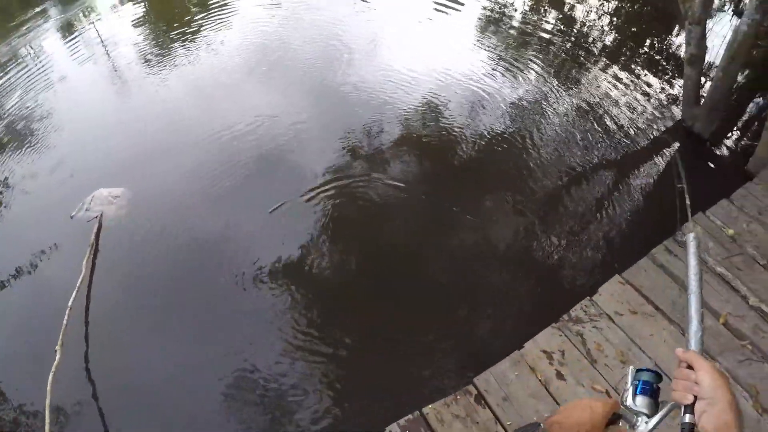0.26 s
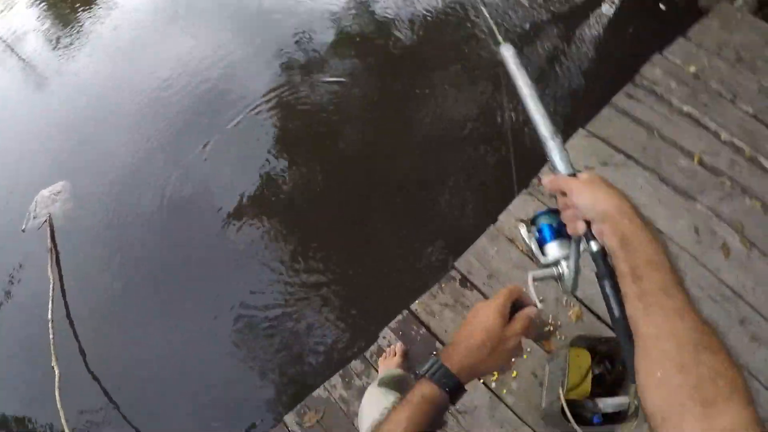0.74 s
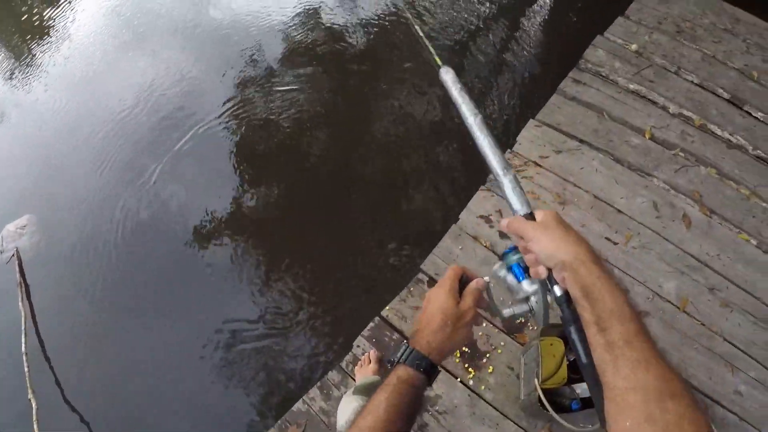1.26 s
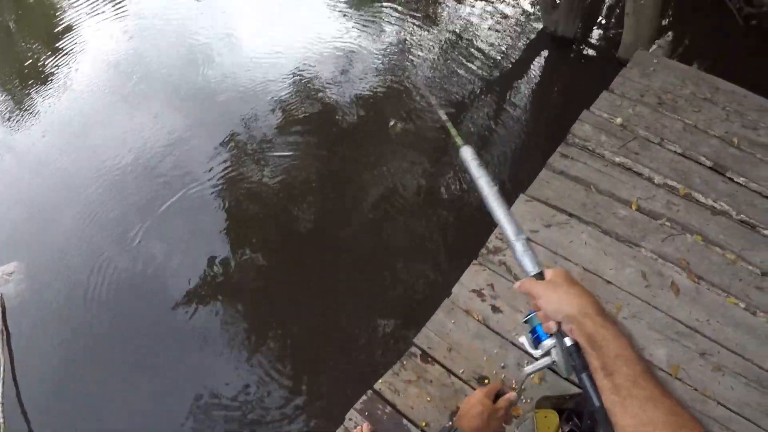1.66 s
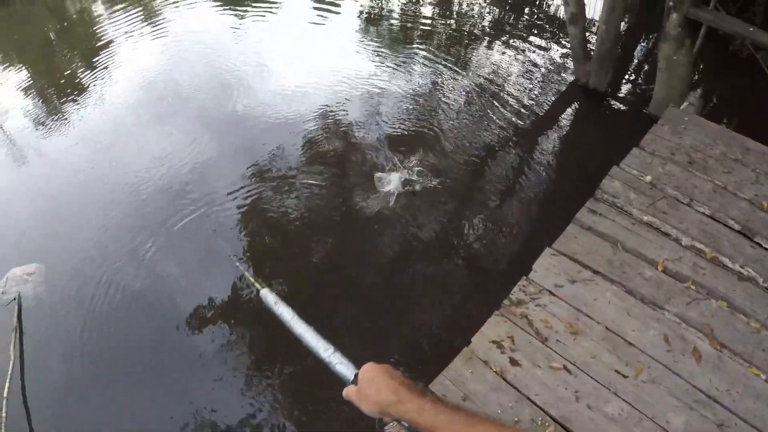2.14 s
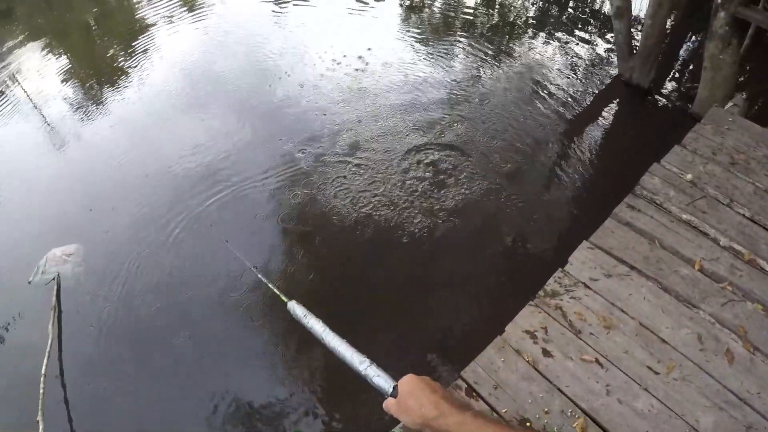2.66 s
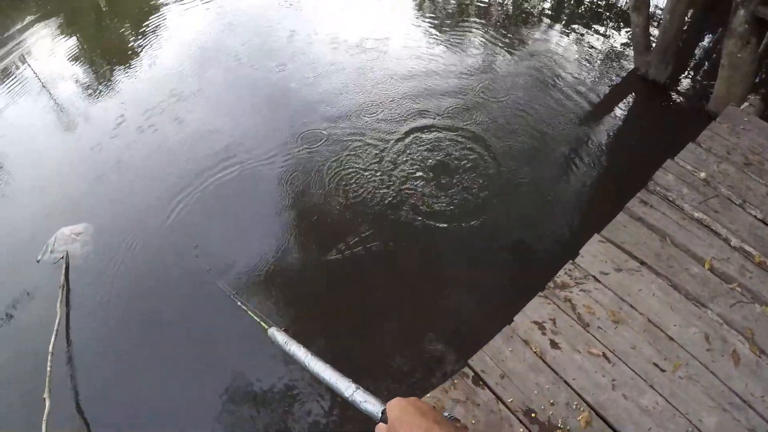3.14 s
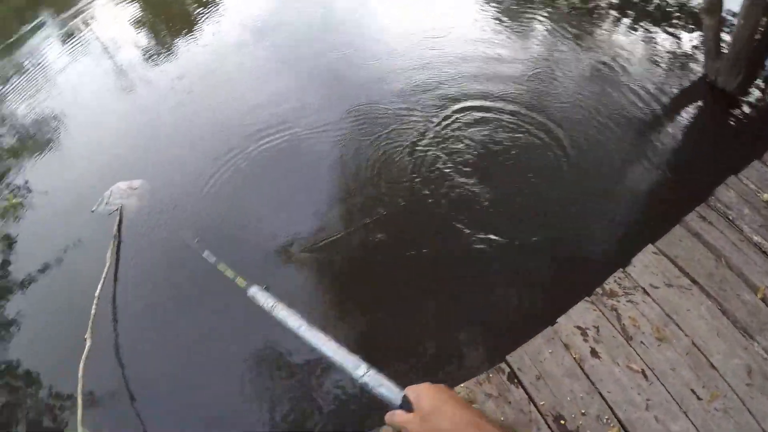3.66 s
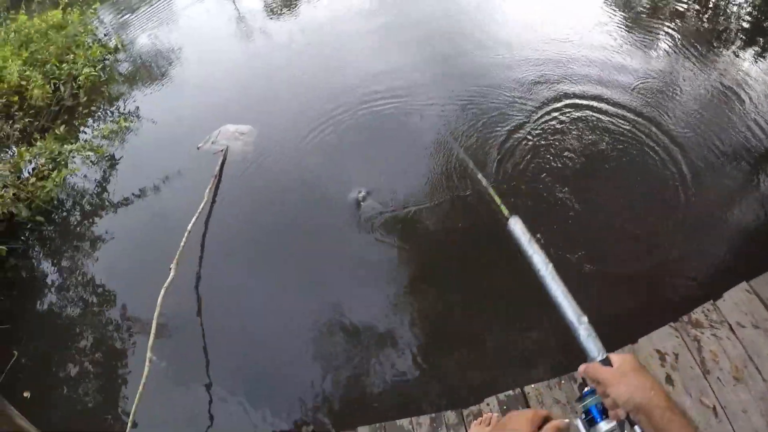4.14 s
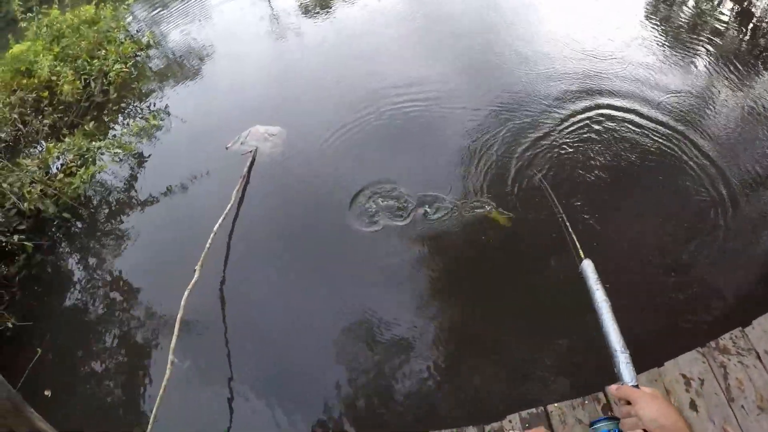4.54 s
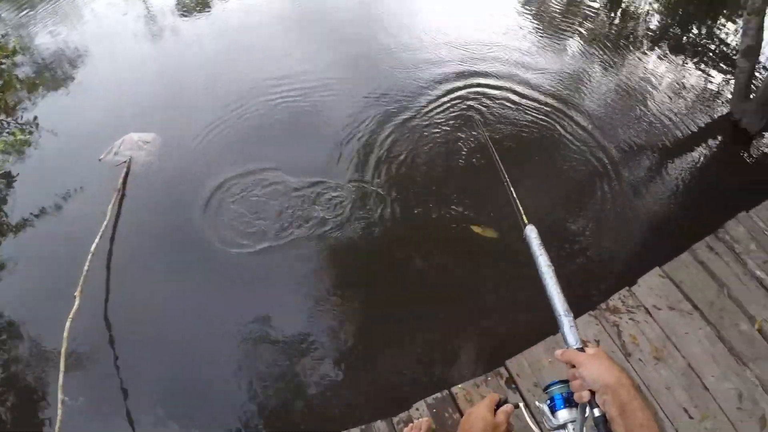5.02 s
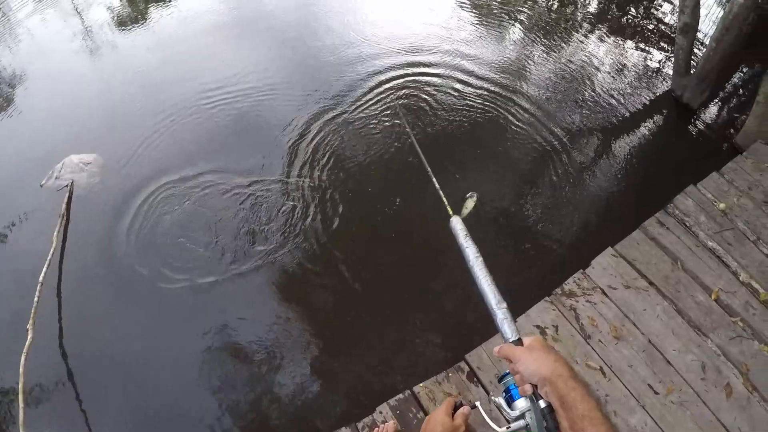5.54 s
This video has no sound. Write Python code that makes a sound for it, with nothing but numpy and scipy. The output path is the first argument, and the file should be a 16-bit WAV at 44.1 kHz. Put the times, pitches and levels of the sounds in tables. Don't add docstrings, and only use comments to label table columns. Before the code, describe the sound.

Steady high insect chorus over a quiet pond while a hooked fish splashes in bursts, rod knocks on boards, and a bird whistles briefly.

```python
import sys
import numpy as np
from scipy import signal
from scipy.fft import rfft, irfft
from scipy.io import wavfile
from scipy.ndimage import uniform_filter1d

SR = 44100
rng = np.random.default_rng(int(sys.argv[2]) if len(sys.argv) > 2 else 0)


def unload_wav(signal):
    wavfile.write(
        sys.argv[1],
        SR,
        np.round(np.clip(np.atleast_2d(signal).T, -1, 1) * 32767).astype(np.int16),
    )


def nominal_scale(level):
    x = np.asarray(level, float) / 20
    return 10 ** x


N = 255162
T = np.arange(N) / SR
HZ = np.fft.rfftfreq(N, 1 / SR)

# frequency in Hz, level in dB per Hz.
AIR_MID = [(12, -45.5), (20, -16), (45, -41), (100, -44.5), (140, -3), (178, 1), (680, -14), (957, -15.5),
           (1650, -19.5), (2550, -19.5), (2850, -21), (3660, -22.5), (4200, -23.5), (4600, -20),
           (5980, -46.5), (10100, -120)]
# frequency in Hz, level in dB per Hz.
AIR_SIDE = [(12, -64), (20, -38), (100, -43), (135, -7), (166, 0.5), (462, -6.5), (696, -6), (1470, -13.5),
            (2990, -24), (4010, -36), (4600, -31.5), (5980, -69), (10100, -120)]
# frequency in Hz, level in dB per Hz.
AIR_TOP = [(8300, -30), (8600, 3), (9500, 1), (10300, 3.5), (11300, -8), (12500, -4.5), (14000, -8.5),
           (14500, -12), (15200, -26)]
# frequency in Hz, level in dB per Hz.
CICADA = [(4450, -52.5), (4800, -6), (5200, -1.5), (5650, 1.5), (6100, 1), (6450, 2), (6800, -2),
          (7050, -16), (7500, -11), (8200, -9), (8450, -26)]
# centre in seconds, length in seconds, peak in dB.
THROBS = [(0.157, 0.11, -36), (0.43, 0.12, -35.5), (0.714, 0.14, -36), (0.957, 0.16, -38.5),
          (1.15, 0.14, -40.5), (1.3, .12, -37.5), (1.556, 0.18, -35), (1.848, 0.11, -35.5),
          (2.13, 0.24, -38.5), (2.37, 0.14, -44), (2.604, 0.21, -36.5), (2.9, 0.14, -36.5),
          (3.166, 0.14, -36.5), (3.417, 0.17, -39.5), (3.673, 0.15, -39), (3.923, 0.14, -39),
          (4.105, 0.14, -42.5), (4.24, 0.072, -38.5), (4.44, 0.21, -38), (4.742, 0.12, -36.5),
          (4.998, 0.14, -36), (5.244, 0.1, -35.5), (5.5, 0.18, -39), (5.744, 0.084, -34.5)]
# start in seconds, length in seconds, pitch in Hz, level in dB.
CHIRPS = [
    (0.301, 0.27, 7680, -55.5),
    (1.785, 0.13, 7750, -72.5),
    (2.372, 0.1, 7720, -51.5),
    (3.19, 0.13, 7760, -60),
    (3.781, 0.079, 7730, -41),
    (4.354, 0.082, 7750, -56),
    (5.167, .2, 7750, -50.5),
]
# start in seconds, length in seconds, level in dB.
TRILLS = [
    (-.1, 1.46, -58),
    (1.812, 2, -57),
    (3.874, 0.39, -59.5),
    (4.233, 1.3, -61),
]
# time in seconds, pitch in Hz, level in dB.
WHISTLE = [
    (1.838, 5480, -47),
    (1.854, 5370, -38),
    (1.885, 5040, -49),
    (1.93, 4700, -47),
    (1.995, 4820, -46),
    (2.06, 4950, -49),
    (2.098, 5200, -41),
    (2.132, 5410, -36),
    (2.158, 5140, -44),
]
# centre in seconds, length in seconds, pitch in Hz, level in dB.
PIPS = [
    (.77, .05, 7480, -57),
    (1.61, 0.08, 7510, -55),
    (2.5, .05, 7500, -57),
    (4.05, 0.1, 7440, -52),
]
# time in seconds, peak in dB, pitch in Hz, 60 dB decay in seconds.
KNOCKS = [(0.493, -34, 214, 0.058), (0.573, -31, 182, 0.058), (0.598, -23.5, 212, 0.026),
          (0.647, -31.5, 225, 0.064), (0.669, -25, 228, 0.038), (0.742, -39.5, 205, 0.098),
          (1.291, -27, 199, 0.029), (1.978, -34, 165, 0.11), (2.109, -25, 422, 0.014),
          (3.353, -25, 198, 0.019), (3.615, -24.5, 226, 0.021), (3.701, -15, 181, 0.037),
          (3.884, -26, 184, 0.018), (4.127, -31.5, 162, 0.086), (4.188, -34, 258, 0.25),
          (4.214, -28, 238, 0.14), (4.406, -33, 168, 0.056), (5.571, -24, 181, 0.031),
          (5.693, -26.5, 187, 0.029)]
# centre in seconds, length in seconds, pitch in Hz, level in dB.
CREAKS = [(1.175, .05, 1560, -55), (1.25, .04, 1570, -63), (1.215, .03, 1020, -61), (1.27, .04, 1010, -60),
          (1.365, .05, 950, -58), (1.345, .05, 1580, -61), (1.39, .03, 1600, -62), (1.44, .04, 1030, -59),
          (1.41, .11, 2120, -62), (1.39, .07, 3150, -64), (1.5, .045, 1600, -57), (1.535, .03, 1620, -62),
          (1.52, .04, 930, -57), (1.55, .04, 1020, -61), (1.53, .06, 3150, -65), (1.55, .09, 2570, -64)]
# start in seconds, end in seconds.
SPLASH = [
    (.42, .8),
    (2.02, 2.38),
    (3.85, 4.42),
]
# time in seconds, peak in dB, ring in Hz, left minus right in dB, treble in dB.
SLAPS = [(0.432, -32.5, 1840, -2, -29), (0.4592, -34.5, 1520, -6, -34), (2.0283, -36, 3490, -2, -28),
         (2.0416, -24, 3060, -3.5, -31), (2.07, -32, 2520, -1, -37.5), (2.079, -29, 3700, -1, -28.5),
         (2.1117, -22, 4740, 2, -38), (2.1993, -34, 2830, 0, -28.5), (2.18, -36, 3400, -1, -35),
         (3.8872, -35.5, 2270, 4, -25), (4.0736, -33, 2100, 1, -29.5), (4.3336, -40, 2060, -6, -29),
         (2.373, -42, 3230, 12.5, -37), (2.0407, -21.5, 1570, -1.5, -29), (2.057, -22, 3460, -2.5, -19),
         (2.1124, -17, 2560, -1, -31), (2.1207, -18, 3520, -3, -23), (2.144, -24.5, 3230, 0, -17),
         (2.162, -26, 2415, -1, -27), (2.23, -27, 3060, 1, -34.5), (2.2539, -25.5, 3490, 1.5, -20),
         (2.319, -31.5, 3510, -2, -27), (2.362, -24.5, 3190, -4, -36), (3.8818, -34.5, 2170, -1, -20.5),
         (4.0387, -35, 3600, -1, -22), (4.1145, -12, 3715, -2.5, -23.5), (4.221, -30, 1750, -14, -23),
         (4.246, -32, 2180, -6.5, -31.5), (4.2966, -40.5, 2780, -22.5, -36),
         (4.3016, -32.5, 3900, -3.5, -21), (4.393, -38.5, 3290, 1, -18), (4.45, -27, 3660, -1, -35),
         (4.4707, -26, 3740, -2.5, -36), (2.2255, -33, 2600, -0.5, -33.5), (2.244, -37.5, 2050, -2, -34.5),
         (2.275, -38, 2390, 0, -33), (2.323, -34, 3690, 0.5, -31.5), (2.092, -30, 3700, 0, -30),
         (2.4, -40, 1700, -3, -36), (4.193, -38, 3930, -1, -32), (4.267, -36, 3220, 0, -32),
         (4.354, -42, 2050, 0, -36), (4.454, -35, 2570, 0, -36)]
# time in seconds, peak in dB, ring in Hz, left minus right in dB.
DROPS = [(1.642, -31.5, 2000, 4), (2.6648, -38.5, 2320, 12), (2.7643, -38.5, 2190, 11.5),
         (2.7874, -40.5, 2320, 5), (2.9462, -40, 1740, 3.5), (3.353, -36.5, 2340, 5.5),
         (3.618, -35.5, 2230, 4), (4.6183, -38.5, 2290, -9), (4.651, -44, 2490, -10),
         (4.825, -38, 2120, -1), (5.1891, -46, 2140, -15.5), (5.276, -45.5, 2220, 13.5),
         (5.4277, -40, 2140, 5), (5.5598, -45, 1710, 16), (5.573, -32.5, 2150, 7), (5.699, -35, 2070, 2)]
# time in seconds, peak in dB, pitch in Hz, 60
# dB decay in seconds, left minus right in dB.
BUBBLES = [(0.433, -28.5, 800, 0.013, -29.5), (0.519, -40, 940, 0.063, -10), (0.544, -32, 563, 0.034, -2),
           (0.589, -25.5, 480, 0.014, -13), (.612, -31, 334, .025, -2), (.725, -30, 655, 0.022, -6),
           (2.133, -19, 914, 0.023, -1), (2.149, -28, 963, 0.032, -6), (2.164, -22.5, 817, 0.023, 0),
           (2.333, -39.5, 413, 0.059, -1), (2.398, -31.5, 980, 0.057, -3), (3.992, -44.5, 1548, 0.1, -17),
           (4.024, -37.5, 1000, 0.045, -21), (4.127, -36, 1036, 0.063, -15), (4.238, -25.5, 459, 0.073, -2),
           (4.354, -40.5, 767, 0.14, 7), (4.155, -34, 1990, 0.033, -11), (4.157, -36.5, 3110, 0.056, -11),
           (4.22, -33, 3100, .03, -7), (4.166, -42, 2050, .03, 1), (0.485, -34, 1600, 0.026, -2),
           (.513, -32, 1520, 0.022, -2), (4.1165, -14, 1670, 0.0092, 11), (4.118, -21, 1096, 0.012, -6),
           (2.166, -31, 890, 0.026, -3), (4.433, -22.5, 1170, 0.02, -8), (4.456, -40, 1184, 0.054, 0),
           (4.447, -24.5, 1070, 0.017, -27.5),
           (4.18, -40, 704, 0.094, -10),
    (4.239, -30, 750, 0.063, -1),
    (4.25, -46, 520, 0.17, -4),
    (.444, -35, 760, .025, -8),
]
# start in seconds, length in seconds, from pitch in Hz, to pitch in Hz, level in dB.
GLIDES = [(.52, 0.014, 1510, 1250, -49), (.54, 0.024, 620, 850, -53), (1.647, 0.014, 2050, 1600, -50),
          (2.133, 0.028, 1350, 1900, -44), (2.081, 0.023, 907, 1744, -43), (2.363, .016, 1220, 1010, -50),
          (2.315, .018, 1450, 1600, -51), (2.15, .016, 1500, 1750, -45), (3.892, 0.071, 756, 640, -51),
          (3.95, .055, 1004, 1514, -51), (4.038, .035, 997, 1056, -52), (4.07, 0.03, 1423, 1550, -53),
          (4.139, 0.1, 997, 1080, -50), (4.27, 0.014, 850, 1000, -51), (4.299, 0.014, 1183, 1500, -51),
          (4.245, .016, 700, 860, -45), (4.326, 0.014, 950, 1200, -47), (4.343, 0.026, 1080, 1120, -51),
          (4.389, 0.014, 970, 990, -50), (4.289, .06, 499, 590, -49)]
# start in seconds, rise in seconds, fall in seconds per 20 dB, level in dB, treble in dB.
SURGES = [
    (0.432, 0.006, 0.12, -50, -6),
    (.46, 0.05, .5, -52, -5),
    (2.04, 0.005, 0.22, -48, 3),
    (2.12, 0.03, 0.05, -42, -7),
    (2.2, 0.04, 0.25, -60, 6),
    (3.85, 0.17, 0.6, -54, 1),
    (4.115, 0.03, 0.22, -45, -3),
    (4.27, 0.06, 0.12, -53, -11),
]
# start in seconds, rise in seconds, fall in seconds per 20 dB, level in dB.
SLOSHES = [
    (.5, 0.085, 0.43, -47.5),
    (2.04, 0.074, 0.068, -50),
    (3.85, 0.026, 0.24, -53),
    (4.12, 0.11, 0.27, -51),
]
# start in seconds, rise in seconds, fall in seconds per 20 dB, level in dB.
SPRAY = (2.025, .08, .16, -64)


def unit(x):
    return x / np.sqrt(np.mean(x ** 2))


def colour(x, points):
    hz, db = np.transpose(points)
    gain = nominal_scale(np.interp(np.log(HZ + 1), np.log(hz), db, -120, -120))
    return unit(irfft(rfft(x) * gain, N))


def band(x, lo_hz, hi_hz):
    return signal.sosfilt(signal.butter(3, [lo_hz, hi_hz], "bandpass", fs=SR, output="sos"), x)


def walk(rate):
    hold = int(SR / rate)
    levels = rng.standard_normal(N // 100 + 2)[:N // hold + 1]
    slewed = uniform_filter1d(uniform_filter1d(np.repeat(levels, hold), hold), hold)
    return unit(slewed[:N])


def swell(start, rise, fall, db):
    onset = np.clip((T - start) / max(rise, .002), 0, 1)
    return nominal_scale(db - 20 * np.maximum(T - start - rise, 0) / max(fall, .01)) * onset


def phrase(start, length):
    return np.clip(np.minimum(T - start, start + length - T) / .035 + .5, 0, 1)


def tone(centre, length, hz, db, waver=.00003):
    edge = np.exp(-((T - centre) / (length / 2)) ** 4)
    return nominal_scale(db) * edge * np.sin(2 * np.pi * hz * (T + waver * walk(25)))


def ring(hz, t60, glide=0., rise=0.0014):
    t = T[:int(t60 * SR) + 8]
    envelope = (1 - np.exp(-t / rise)) * np.exp(-np.log(1000) * t / t60)
    return envelope * np.sin(2 * np.pi * hz * (t + glide * t ** 2 / t60))


def add(out, s, sound, pan_db):
    i = int(s * SR)
    sound = sound[:N - i]
    out[:, i:i + len(sound)] += nominal_scale(np.array([[pan_db], [-pan_db]]) / 2) * sound


def trees(x, t60, wet_db):
    t = T[:SR // 3]
    tail = rng.standard_normal((2, len(t))) * np.exp(-np.log(1000) * t / t60)
    tail = tail / np.sqrt(np.sum(tail ** 2, axis=1, keepdims=True))
    return x + nominal_scale(wet_db) * signal.fftconvolve(x, tail, axes=1)[:, :N]


def air():
    flicker = nominal_scale(1.9 * walk(13) + 1.0 * walk(3.9))
    gust_s, gust_half_s, gust_db = 1.46, 0.34, 2.6
    gust = gust_db * np.exp(-((T - gust_s) / gust_half_s) ** 2)
    breeze = nominal_scale(0.8 + gust + 0.15 * walk(0.3))

    def stir(x):
        return x + (flicker - 1) * band(x, 67, 387) + (breeze - 1) * band(x, 348, 6200)

    mid = stir(colour(rng.standard_normal(N), AIR_MID) * nominal_scale(-54.5 + 1.0 + 0.077 * walk(3.8)))
    side = stir(colour(rng.standard_normal(N), AIR_SIDE) * nominal_scale(-48.5 + 0.91 * walk(3.8)))
    top = colour(rng.standard_normal((2, N)), AIR_TOP) * nominal_scale(-68 + 0.85 * walk(9.0))
    puff = nominal_scale(-84) + swell(-.1, .3, 2.2, -67)
    wind = unit(band(rng.standard_normal((3, N)), 1.9, 52)) * puff * nominal_scale(1.5 * walk(5.0))
    return np.array([mid + side, mid - side]) + top + 0.82 * wind[0] + wind[1:]


def cicadas():
    clicks = rng.standard_normal((2, N)) * nominal_scale(2.2 * np.minimum(rng.exponential(size=(2, N)), 7))
    return colour(clicks, CICADA) * nominal_scale(-39 - 0.1 * walk(2) + 0.6 * walk(25))


def crickets(hz, spread_hz, strokes, sharp, patchy_db, count):
    out = np.zeros((2, N))
    ranks = np.linspace(-1.6, 1.6, count)
    for off, (pace, turn, pan) in zip(ranks, rng.standard_normal((count, 3))):
        stroke = np.cumsum(strokes * (1 + .1 * pace + 0.03886 * walk(6))) / SR + turn
        gate = np.sin(np.pi * stroke) ** 2
        detune = off + .45 * walk(20) - 0.76 * (stroke % 1 - .5)
        wing = 2 * np.pi * np.cumsum(hz + spread_hz * detune) / SR
        ports = np.sin(wing + np.array([[0], [3 * turn]])) * nominal_scale(np.array([[2.0 * pan], [-2.0 * pan]]))
        out += np.exp(-off ** 2 / 2.3) * gate ** sharp * nominal_scale(patchy_db * walk(4.614)) * ports
    return unit(out)


def chorus():
    buzz = cicadas()
    in_step = sum(nominal_scale(db) * np.exp(-((T - s) / (0.67 * length)) ** 2) for s, length, db in THROBS)
    throb = crickets(6425., 105., 58., 1.6, 0.55, count=13) * (nominal_scale(-57) + nominal_scale(1.0) * in_step)

    murmur_hz, murmur_db, murmur_hold_s = 7720., -56, 5.52
    chirp_hz, loud = murmur_hz, nominal_scale(murmur_db) * phrase(-0.66, 1 + murmur_hold_s)
    for s, length, hz, db in CHIRPS:
        gate = phrase(s, length)
        chirp_hz = chirp_hz + (hz - murmur_hz) * gate
        loud = loud + nominal_scale(db) * gate
    chirp = crickets(chirp_hz, 50., 24., 0.33, 4.5, count=3) * loud * nominal_scale(np.array([[-1.5], [1.5]]))

    sings = nominal_scale(-70.5) + sum(nominal_scale(db) * phrase(s, length) for s, length, db in TRILLS)
    trill = crickets(8095., 28., 37., 1.8, 1.4, count=4) * sings * nominal_scale(np.array([[2.5], [5.0]]))
    return buzz + trees(throb + chirp + trill, 0.76, -3.0) * nominal_scale(-0.9)


def birds():
    s, hz, db = np.transpose(WHISTLE)
    edge = np.clip(np.minimum(T - s[0], s[-1] - T) / 0.0039, 0, 1)
    level = edge * nominal_scale(np.interp(T, s, db) + 2.5 + 2.0 * walk(70))
    whistle = level * np.sin(2 * np.pi * np.cumsum(np.interp(T, s, hz) + 25 * walk(80)) / SR)
    bank_echo_s, bank_echo_db = 0.037, -5
    whistle = whistle + nominal_scale(bank_echo_db) * np.roll(whistle, int(bank_echo_s * SR))
    pips = sum(tone(*pip) for pip in PIPS)
    return trees(np.array([whistle + pips, .7 * whistle + pips]), .2, -8.0)


def tackle():
    out = np.zeros((2, N))
    for s, db, hz, t60 in KNOCKS:
        t60 = max(t60, .01)
        add(out, s, nominal_scale(db - 5.0) * ring(hz, t60, rise=0.0014), 3.0)
        add(out, s, nominal_scale(db - 15.5) * ring(1.364 * hz, 1.2 * t60, rise=0.0016), 3.0)
        add(out, s, nominal_scale(db - 13.5) * ring(850, 0.0091), 3.0)
        add(out, s, nominal_scale(db - 17.5) * ring(520, 0.028), 3.0)
    creak = sum(tone(*note, waver=.00025) * nominal_scale(2.5 * walk(110) - 1) for note in CREAKS)
    return out + np.array([[.4], [1.4]]) * creak


def ticks():
    out = np.zeros((2, N))
    slap_low_db, drop_top_db, drop_low_db = -14, -30, -12
    hits = [(*row, slap_low_db) for row in SLAPS] + [(*row, drop_top_db, drop_low_db) for row in DROPS]
    for s, db, hz, pan, top_db, low_db in hits:
        burst = rng.standard_normal(300) * np.exp(-T[:300] / 0.0016)
        crack = band(burst, hz / 1.55, max(hz * 1.3, 3600))
        spit = band(burst, 5500, 11500)
        thud = band(burst, 350, 1800)
        add(out, s - .001, nominal_scale(db + top_db + 23.0) * ring(6740, 0.0027, rise=0.00005), pan)
        add(out, s - .001, nominal_scale(db + top_db - 2.5) * spit / np.max(np.abs(spit)), pan)
        add(out, s, nominal_scale(db - 1.5) * ring(hz, 0.0082, -0.031, 0.000079), pan)
        add(out, s, nominal_scale(db - 7.0) * crack / np.max(np.abs(crack)), pan)
        add(out, s + 0.00296, nominal_scale(db + low_db - 1.5) * thud / np.max(np.abs(thud)), pan)
    return out


def glide(length, from_hz, to_hz):
    t = T[:int(length * SR)]
    body = np.sin(np.pi * t / length) ** .6 * nominal_scale(2.0 * walk(150)[:len(t)])
    return body * np.sin(2 * np.pi * (from_hz * t + (to_hz - from_hz) * t ** 2 / (2 * length)))


def bubbles():
    out = np.zeros((2, N))
    for s, db, hz, t60, pan in BUBBLES:
        add(out, s, nominal_scale(db) * ring(hz, max(t60, .01), 0.04, 0.0038), pan)
    for s, length, from_hz, to_hz, db in GLIDES:
        add(out, s, nominal_scale(db - 1) * glide(length, from_hz, to_hz), -12)
    return out


def swarm(lo_hz, hi_hz, cycles, count):
    out = np.zeros((2, N))
    for start, end in SPLASH:
        for when, size, long, power, side in rng.random((count, 5)):
            hz = lo_hz * (hi_hz / lo_hz) ** size
            bubble = ring(hz, cycles * (0.72 + 1.4 * long ** 2) / hz, 0.23, 0.68 / hz)
            add(out, start + when * (end - start), nominal_scale(-12.0 * power) * bubble, 10.0 * (side - .5))
    return unit(out) * 0.34


def churn():
    wash = rng.standard_normal((3, N)) * nominal_scale(3.0 * walk(50) + 2.1 * walk(220))
    wash = wash[0] + wash[1:]
    slosh = swarm(237.5, 629.0, 35.0, count=60) + 0.73 * unit(band(wash, 153, 520))
    low = .6 * swarm(700., 2000., 30., count=90) + .65 * unit(band(wash, 600, 1600))
    high = .7 * swarm(2000., 4200., 30., count=120) + .65 * unit(band(wash, 1800, 3800))
    out = swell(*SPRAY) * nominal_scale(6.0 * walk(120)) * unit(band(wash, 6600, 14000))
    for *surge, top_db in SURGES:
        out += swell(*surge) * (nominal_scale(2.5) * low + nominal_scale(top_db + 3.0) * high)
    return out + sum(swell(*row) for row in SLOSHES) * slosh


def water():
    return trees(ticks() + bubbles() + churn(), 0.075, -15)


def scene():
    bass_cut = signal.ellip(5, 1, 30, 135, "highpass", fs=SR, output="sos")
    far = air() + chorus() + birds()
    return far + signal.sosfilt(bass_cut, tackle() + water())


def low_pass(x):
    return signal.sosfilt(signal.butter(12, 14950, fs=SR, output="sos"), x)


def record(dry):
    return low_pass(dry)


dry = scene()
out = record(dry)
unload_wav(out)
```